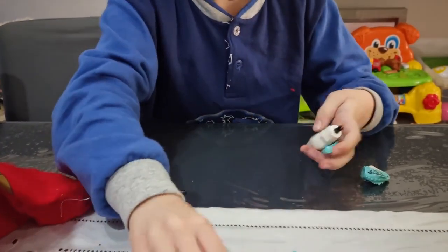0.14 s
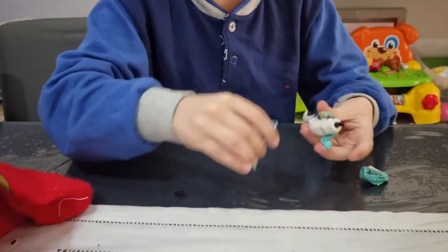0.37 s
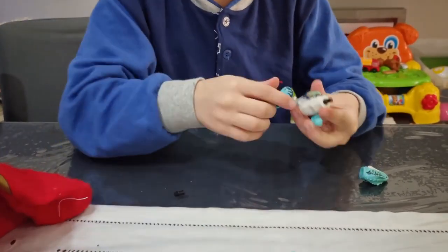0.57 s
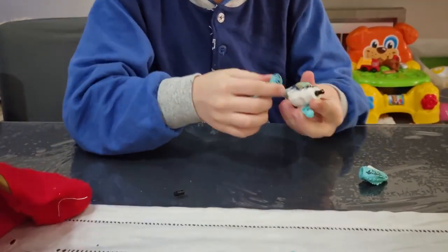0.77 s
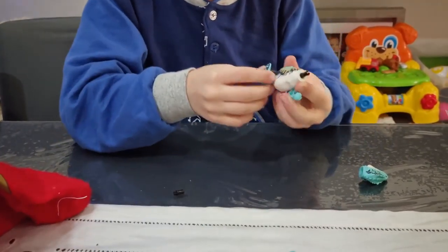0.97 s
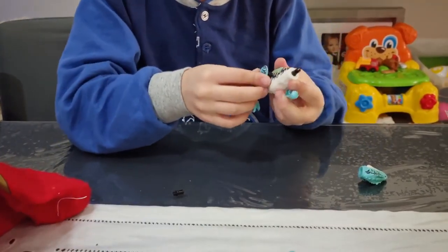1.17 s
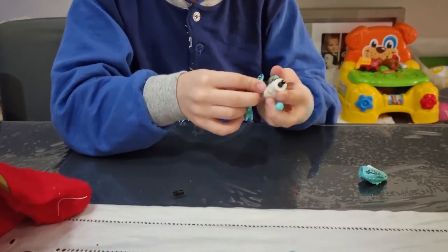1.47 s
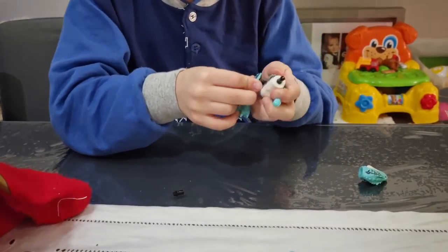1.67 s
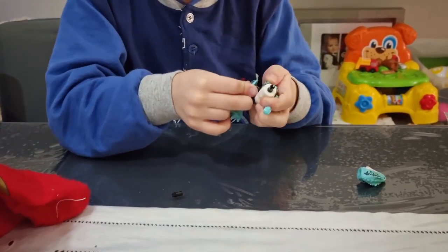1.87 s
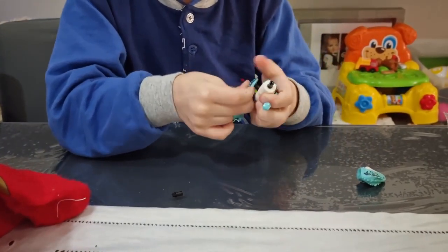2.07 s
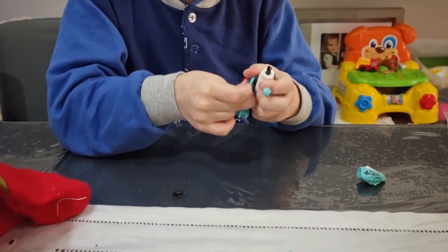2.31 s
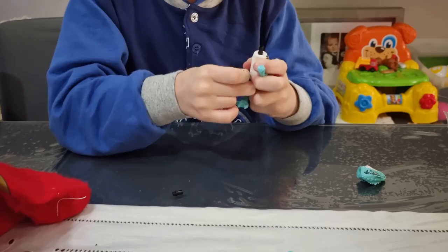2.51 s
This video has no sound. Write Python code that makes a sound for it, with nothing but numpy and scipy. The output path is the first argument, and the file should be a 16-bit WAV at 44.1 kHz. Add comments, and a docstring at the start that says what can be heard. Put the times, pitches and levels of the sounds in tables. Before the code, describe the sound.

Small plastic toy pieces clatter on a hard tabletop, then tick and snap together in fingers

```python
"""In a quiet, live room, small plastic toy pieces are handled over a hard table.
A piece taps and then clatters on the tabletop; later the parts tick and snap as fingers press them together.
Clicks and ticks are short ringing tones with bare ticks; knocks are bursts of contacts that ring the table.
Soft thumps are fading low tones; a low rumble and the hush of the room are shaped noise."""
import sys
import numpy as np
from scipy import signal
from scipy.fft import rfft, irfft
from scipy.io import wavfile
from scipy.ndimage import uniform_filter1d

SR = 44100
rng = np.random.default_rng(int(sys.argv[2]) if len(sys.argv) > 2 else 0)


def inscribe(sig):
    """Save sig as 16-bit PCM at rate SR to the path in sys.argv[1].

    A 1-D sig is mono; a 2-D sig holds one channel per row.
    Samples are clipped to [-1, 1] before scaling.
    """
    pcm = np.round(np.clip(np.atleast_2d(sig).T, -1, 1) * 32767)
    wavfile.write(sys.argv[1], SR, pcm.astype(np.int16))


def boost(x):
    """Linear amplitude factor 10**(x/20) for a level x in decibels (scalar or array-like)."""
    u = np.asarray(x, float) / 20
    return 10 ** u


N = 116865  # length in samples


def evened(x):
    """Scales to unit rms."""
    return x / np.sqrt(np.mean(x ** 2) + 1e-20)


def peaked(x):
    """Scales to unit peak."""
    return x / (abs(x).max() + 1e-20)


def read(points, hz):
    """Reads a table on a log-frequency axis."""
    f, value = np.transpose(points)
    return np.interp(np.log(hz + 1), np.log(f + 1), value)


def add(mix, s, sound):
    """Mixes a sound in at a time in seconds, cutting off what runs past the end."""
    part = mix[round(s * SR):][:len(sound)]
    part += sound[:len(part)]


def causal(gain_db):
    """Minimum-phase filter, which reacts as early as it can, from a rule giving dB at each frequency."""
    hz = abs(np.fft.fftfreq(2048, 1 / SR)) + 20
    log_gain = np.log(boost(np.maximum(gain_db(hz), -90)))
    return np.fft.ifft(np.exp(np.conj(signal.hilbert(log_gain)))).real[:1024]


def noise(colour, same, lean, patchy_db, size):
    """Two-channel noise from random short-time spectra, with patches that drift in pitch and time."""
    hz = np.fft.rfftfreq(size, 1 / SR)
    a, b, c, d, patches = rng.standard_normal((4 * N // size + 5, len(hz), 5)).T
    patches = uniform_filter1d(patches, 14, axis=0)  # along frequency
    patches = evened(uniform_filter1d(patches, 8, axis=1))  # along time
    like = np.clip(read(same, hz), -1, 1)[:, None]
    left = a + 1j * b
    right = like * left + np.sqrt(1 - like ** 2) * (c + 1j * d)
    lean_db = np.array([[0.5], [-0.5]]) * read(lean, hz)
    level_db = read(colour, hz)[:, None] + patchy_db * patches + lean_db[:, :, None]
    spectra = np.array([left, right]) * boost(level_db)
    x = signal.istft(spectra, nperseg=size, noverlap=3 * size // 4)[1][:, :N]
    return x / np.sqrt(np.mean(x.mean(0) ** 2))  # unit rms for the average of both sides


def hush():
    """The steady, faint noise of the quiet room."""
    # Tone of the hush. Each row: frequency in Hz, relative level in dB per Hz.
    hush_colour = [(12, -30), (20, -6), (50, 2), (150, -12), (220, -24), (393, -27), (599, -35), (816, -28),
                   (1210, -37), (1720, -22.5), (2200, -32), (2830, -24), (3230, -30), (5000, -29),
                   (6710, -34), (7600, -31), (10800, -41), (14500, -27), (16500, -50)]
    # How alike the sides are. Each row: frequency in Hz, likeness (1 same, 0 unrelated, -1 opposite).
    hush_same = [(60, -0.54), (240, -0.37), (950, 1), (3770, 1), (15000, -0.72)]
    # Which side is louder. Each row: frequency in Hz, left minus right in dB.
    hush_lean = [(60, -2), (240, -1.5), (950, -4), (3770, -9), (15000, -2.5)]
    return boost(-67.5) * noise(hush_colour, hush_same, hush_lean, patchy_db=1.5, size=2048)


def ring(modes, detune, push_s=1e-9, turns=None):
    """Natural tones of a body: sines that grow while pushed and then die."""
    if turns is None:
        turns = np.zeros(len(modes))
    t = np.arange(SR // 2) / SR
    grow = np.minimum(0.14 + t / push_s, 1)
    after = np.maximum(t - push_s, 0)
    total = np.zeros(len(t))
    for (hz, db, t60), shift, phase in zip(modes, detune, turns):
        total += boost(db - 60 * after / t60) * np.sin(2 * np.pi * (hz * shift * t + phase))
    return grow * total


def whitened(x):
    """Evens out the broad peaks and dips of a burst's spectrum."""
    z = rfft(x, 4096)
    return irfft(z / np.sqrt(uniform_filter1d(abs(z) ** 2, size=20)))[:len(x)]


def knock(db, rattle_s, board_db, bright_db):
    """A short rattle of hard contacts that also sets the tabletop ringing."""
    # Tone of the contacts. Each row: frequency in Hz, relative level in dB per Hz.
    knock_colour = [(59, -56.5), (100, -24), (903, -4.5), (1640, -8), (2990, -4), (3860, -7.5),
                    (7810, -12.5), (11000, -23.5), (14500, -16.5), (16500, -43)]
    # Natural tones of the table. Each row: frequency in Hz, relative level in dB, time to fall 60 dB in s.
    board_modes = [(122, -8, 0.3), (149.14, -2.5, 0.6), (246.6, -6.5, 0.42), (309, 3.5, 0.16),
                   (412, -5, 0.1), (584, -8.5, 0.088), (734.4, 7, 0.46), (785, -0.5, 0.2), (837.7, 6, 0.12),
                   (938, 1, 0.15), (1130, 6, 0.15), (1470, 9, .05), (2500, 4, 0.061)]
    contacts_per_s = 9000
    happens, side, size = rng.random((3, 1024))
    t = np.arange(1024) / SR
    contacts = (happens < contacts_per_s / SR) * np.sign(side - 0.5) * (0.15 + size)
    contacts *= np.clip((rattle_s - t) / 0.0017, 0, 1)  # dies away at the end
    contacts *= np.minimum(0.4 + t / 0.004, 1)  # builds up at the start
    contacts = whitened(contacts + 0.5 * (t == 0))  # with a push at the very start
    colour = causal(lambda hz: read(knock_colour, hz) + bright_db * np.log2(hz / 3000))
    crack = peaked(signal.fftconvolve(contacts, colour))
    board = signal.fftconvolve(contacts, ring(board_modes, np.ones(len(board_modes))))
    low_cut = signal.butter(4, 70, 'high', fs=SR, output='sos')
    sound = boost(db + board_db - 11) * peaked(signal.sosfilt(low_cut, board))
    add(sound, 0, boost(db + 4) * crack)
    return sound


def knocks():
    """A piece strikes the tabletop: one burst of contacts for each row of the table."""
    # Each row: start in seconds, level setting in dB, rattle length in seconds,
    # further level of the board alone in dB, brightness of the contacts in dB per octave.
    knock_rows = [(0.07, -36, 0.0054, -1, -4.5), (0.2075, -19, 0.0075, -8, -2.5),
                  (.2103, -2.5, .011, -4., 0.), (2.414, -39, 0.0161, -7.5, -2.5)]
    mix = np.zeros(N)
    for s, *row in knock_rows:
        add(mix, s, knock(*row))
    return mix


def click(modes, db, turn_hz, low_db, high_db, slip_s):
    """A catch slips: the modes build up over the slip among a few bare ticks, shaped around one pitch."""
    detune = 1 + 0.0069 * (rng.random(len(modes)) - 0.5)  # grip shifts each mode a little
    body = ring(modes, detune, slip_s, np.arange(len(modes)) / 2)[:1024]
    at = (rng.random(6) * slip_s * SR).astype(int)
    bare_ticks = np.sign(rng.random(6) - 0.5) * rng.random(6)
    body[at] += boost(10) * abs(body).max() * bare_ticks
    colour = causal(lambda hz: -np.maximum(low_db * np.log2(turn_hz / hz), high_db * np.log2(hz / turn_hz)))
    return boost(db + 4.5) * peaked(signal.fftconvolve(body, colour))


def clicks(rows, modes):
    """A series of slipping catches in one kind of piece."""
    mix = np.zeros(N)
    for s, *row in rows:
        add(mix, s, click(modes, *row))
    return mix


def plastic_clicks():
    """Clicks and snaps of the plastic parts, whose many short modes ring together."""
    # Each row: start in seconds, level in dB before a shared lift, frequency the tone is shaped around in Hz,
    # slope below it in dB per octave, slope above it in dB per octave (negative lets the treble rise),
    # slip length in seconds.
    click_rows = [(0.0704, -38, 5500, 24.5, 14, 0.00088), (.9208, -34.5, 3280, 8.5, 5.5, .003),
                  (1.09, -57, 6010, 6.5, 16.5, 0.012), (1.1628, -58, 4784, 20, 10.5, 0.0025),
                  (1.2826, -40.5, 3266, 14.5, 6, 0.0024), (1.286, -31.5, 3400, 21, 13, 0.0014),
                  (1.5294, -50.5, 6030, 9.5, -16, 0.00095), (2.4025, -32, 4480, 23.5, 7, 0.0033),
                  (2.4277, -9.5, 4080, 8.5, 11, 0.002064)]
    # Natural tones of the plastic. Each row: frequency in Hz before a small random shift,
    # relative level in dB, time to fall 60 dB in seconds.
    plastic_modes = [(2184, -2.5, 0.016), (2910, -2, 0.009), (3560, -4, 0.011), (3780, -1.5, 0.0094),
                     (4600, -3.5, 0.0052), (5025, -0.5, 0.0045), (5460, -2.5, .004), (6420, 0., 0.002),
                     (7400, 0.5, 0.0018), (8730, -3.5, 0.0014), (10530, -3.5, 0.002), (12800, 0, .002),
                     (14800, 1, .004)]
    return clicks(click_rows, plastic_modes)


def placed(x, pan_db, lag_s):
    """Pans a source by left minus right dB, with the left side hearing it a little later."""
    sides = np.array([np.roll(x, round(lag_s * SR)), x])
    return boost([[pan_db / 2], [-pan_db / 2]]) * sides


def room(x, wet_db):
    """Sparse random taps dying band by band, with a few stronger single echoes among the early ones."""
    # How long the room rings. Each row: frequency in Hz, time to fall 60 dB in seconds.
    room_t60 = [(150, 0.61), (400, 0.57), (800, 0.41), (2000, 0.43), (5000, 0.41), (8000, 0.39),
                (11000, 0.2), (16000, 0.34)]
    # Tone of the reflections. Each row: frequency in Hz, gain in dB.
    room_colour = [(100, -0.5), (300, -3), (1000, 0.5), (4000, -2.5), (8500, 1), (10500, 2), (13000, 0.5),
                   (16000, -9.5)]
    # Single echoes. Each row: delay in seconds before a tiny random shift, level in dB, left minus right in dB.
    single_echoes = [(.0075, -4, -6.5), (.010, -11, 13.5), (0.0131, -11.5, 10.5), (.019, -14, -16.5),
                     (0.025, -13.5, -17)]
    # How alike the sides of the tail are. Each row: frequency in Hz, likeness (1 same, 0 unrelated).
    room_same = [(150, 1), (350, 0.043), (900, 0.29), (2500, .1)]
    tail_start_s, tail_rise_s, tail_pan_db = 0.0053, 0.00531, -2.5
    taps, echoes = np.zeros((2, 2, SR))
    at = np.arange(0, SR - 20, 20) + rng.integers(0, 20, (2, SR // 20 - 1))
    np.put_along_axis(taps, at, rng.choice([-1., 1.], at.shape), 1)
    hz, t, z = signal.stft(taps, SR, nperseg=256)
    like = np.clip(read(room_same, hz), -1, 1)[:, None]
    z = np.array([z[0], like * z[0] + np.sqrt(1 - like ** 2) * z[1]])
    fade = boost(-60 * t / read(room_t60, hz)[:, None])
    tail = signal.istft(z * fade, SR, nperseg=256)[1][:, :SR]
    tail = tail * np.clip((np.arange(SR) / SR - tail_start_s) / tail_rise_s, 0, 1)
    tail = boost([[tail_pan_db / 2], [-tail_pan_db / 2]]) * tail / np.linalg.norm(tail[0])
    for delay, db, pan_db in single_echoes:
        places = round(delay * SR) + rng.integers(-12, 12, 2)
        echoes[[0, 1], places] = boost(db + np.array([0.5, -0.5]) * pan_db)
    walls = signal.fftconvolve(x, causal(lambda hz: read(room_colour, hz)))
    return boost(wet_db) * signal.fftconvolve(walls[None], tail + echoes, axes=1)[:, :N]


def thump(db, hz, t60):
    """A soft low push that swells and dies."""
    t = np.arange(SR // 2) / SR
    swell = 1 - np.exp(-t / 0.0032)
    return boost(db - 60 * t / t60) * swell * np.sin(2 * np.pi * hz * t)


def thumps():
    """Soft thumps, made of fading low tones."""
    # Each row: start in seconds, level in dB before the swell and fade, frequency in Hz,
    # time to fall 60 dB in seconds.
    thump_rows = [(0.506, -61, 150.7, 0.17), (0.513, -54, 280.7, 0.14), (0.689, -39.5, 64.16, 0.35),
                  (0.698, -52, 102, 0.36), (2.431, -45.5, 141.3, 0.52)]
    mix = np.zeros(N)
    for s, *row in thump_rows:
        add(mix, s, thump(*row))
    return mix


def peg_ticks():
    """Ticks of the small peg, which slips like the other catches but rings with its own modes."""
    # Each row: start in seconds, level in dB before a shared lift, frequency the tone is shaped around in Hz,
    # slope below it in dB per octave, slope above it in dB per octave, slip length in seconds.
    tick_rows = [(1.588, -50.5, 4340, 7.7, 17, 0.0011), (1.7965, -48, 4300, 10, 31, .002),
                 (2.163, -26, 4290, 14, 2.1, 0.0015), (2.345, -37.5, 4247, 23, 3.5, 0.0017),
                 (2.6264, -43, 4100, 21.1, 11, 0.0015)]
    # Natural tones of the peg. Each row: frequency in Hz before a small random shift,
    # relative level in dB, time to fall 60 dB in seconds.
    peg_modes = [(3620, -18, .006), (4270, 0., .0045), (5670, -6, .006), (6720, -16, .006),
                 (7600, -7, .007), (10400, -8, .006), (12250, -14, .006), (13950, -3, .006)]
    return clicks(tick_rows, peg_modes)


def rumble():
    """Lumpy low noise that swells and fades."""
    # Path of the loudness before smoothing and a fade-in. Each row: time in seconds, level in dB.
    rumble_path = [(1.85, -63), (1.921, -65), (2.027, -30.5), (2.08, -38.5), (2.119, -30), (2.141, -30.5),
                   (2.182, -37.5), (2.24, -35.5), (2.378, -44.5), (2.408, -39), (2.426, -34), (2.472, -42),
                   (2.614, -47.5), (2.65, -58.5)]
    # Tone of the rumble. Each row: frequency in Hz, relative level in dB per Hz.
    rumble_colour = [(12, -15), (27, -8.5), (45, -14), (80, -21), (150, -35), (300, -42.5)] + [(500, -62), (1100, -105)]
    s, db = np.transpose(rumble_path)
    t = np.arange(N) / SR
    level = boost(uniform_filter1d(np.interp(t, s, db), size=1200))
    level *= np.clip((t - s[0]) / 0.14, 0, 1)  # fades in from silence
    same, lean = [(20, 0.97), (400, 0.75)], [(20, -4.0), (400, 0.0)]
    return level * noise(rumble_colour, same, lean, patchy_db=-4.0, size=8192)


def scene():
    """Clicks, ticks and knocks in the room, over thumps, rumble and hush."""
    plastic, peg, table = plastic_clicks(), peg_ticks(), knocks()
    near = placed(plastic + peg, pan_db=-9, lag_s=0.0002) + placed(table, pan_db=-5.5, lag_s=0.0004)
    near = near + thumps()  # equal on both sides
    reflected = room(plastic, wet_db=-4.5) + room(peg, wet_db=-8.5) + room(table, wet_db=-0.5)
    return near + reflected + rumble() + hush()


def roll_off(x):
    """The treble ends steeply here."""
    return signal.sosfilt(signal.butter(12, 16820, fs=SR, output="sos"), x)


def record(dry):
    """Gain control turns the sound down around loud blows and recovers slowly."""
    threshold_db, share, recover_db_per_s = -44, 0.18, 23.5  # recovery is of the level it follows
    power = (np.diff(dry, prepend=0) ** 2).mean(0)  # differences favour the treble
    power_db = 10 * np.log10(abs(uniform_filter1d(power, size=400)) + 1e-12)
    fall = np.arange(N) * recover_db_per_s / SR
    held_db = np.maximum.accumulate(power_db + fall) - fall  # jumps up, sinks steadily
    over_db = np.maximum(held_db - threshold_db, 0)
    ducked = dry / boost(share * uniform_filter1d(over_db, size=800))
    return roll_off(ducked)


dry = scene()
out = record(dry)
inscribe(out)
```